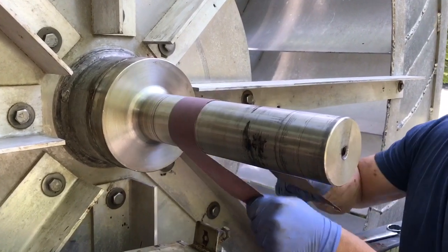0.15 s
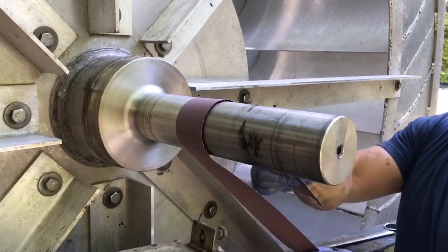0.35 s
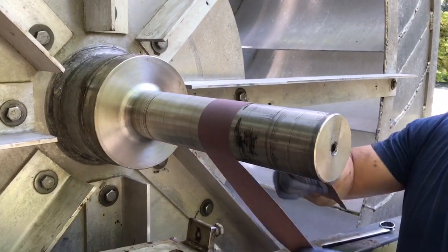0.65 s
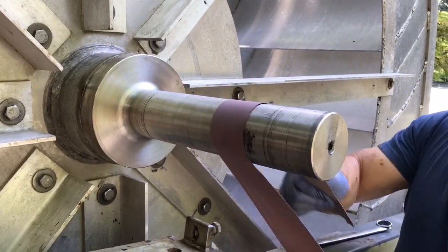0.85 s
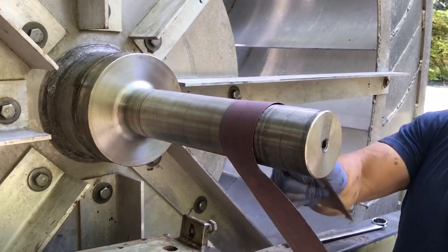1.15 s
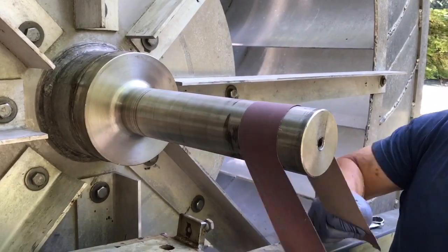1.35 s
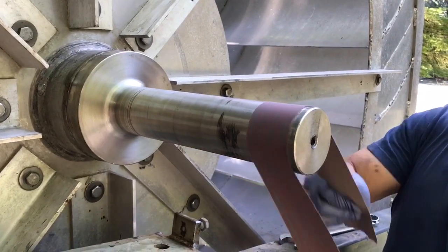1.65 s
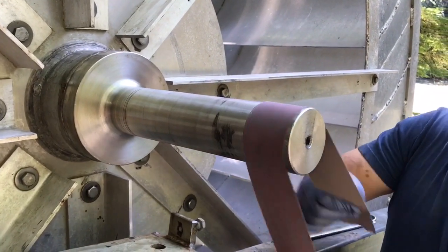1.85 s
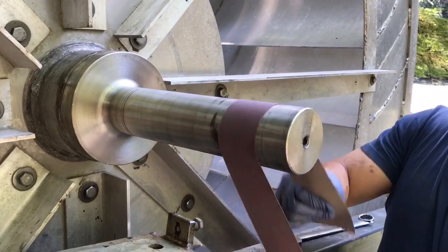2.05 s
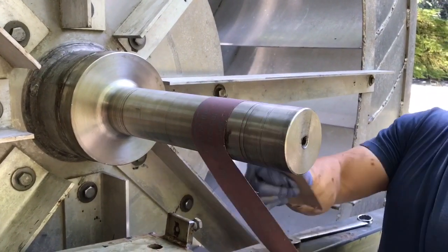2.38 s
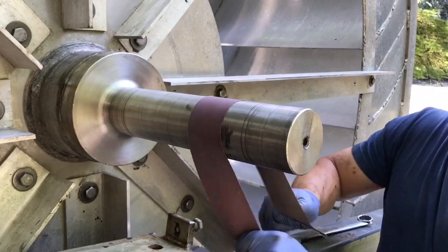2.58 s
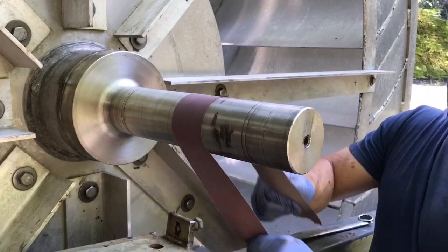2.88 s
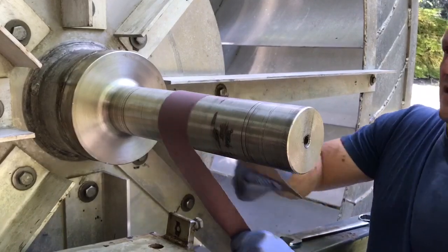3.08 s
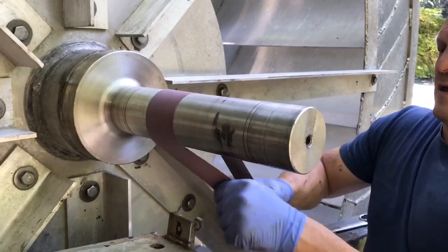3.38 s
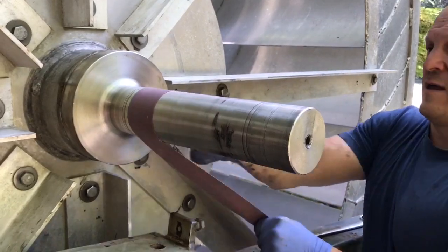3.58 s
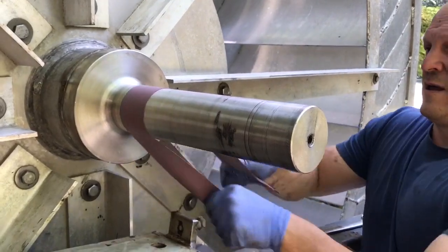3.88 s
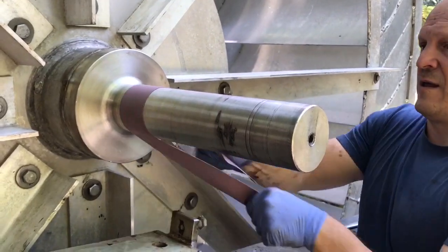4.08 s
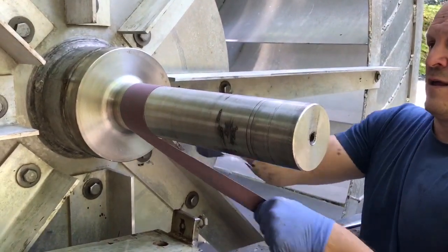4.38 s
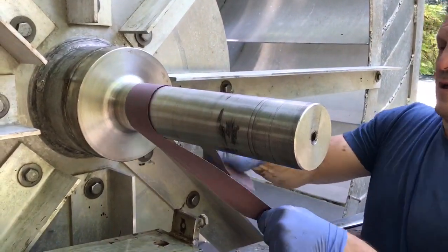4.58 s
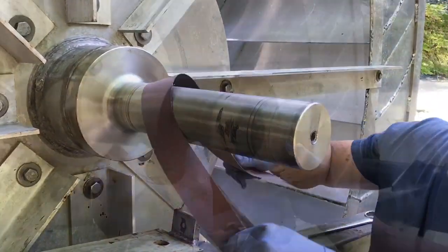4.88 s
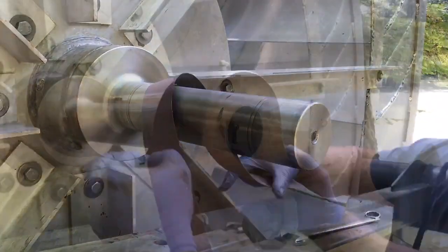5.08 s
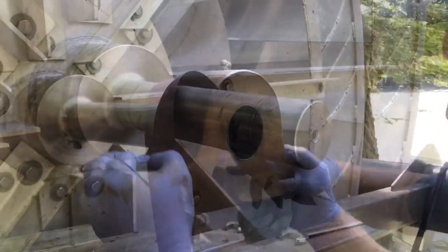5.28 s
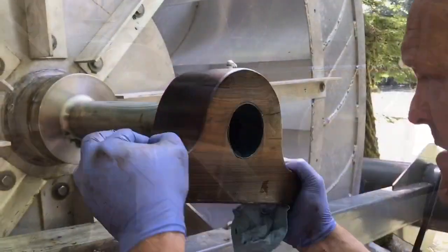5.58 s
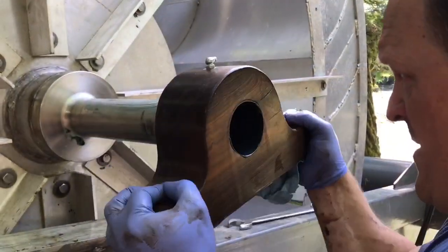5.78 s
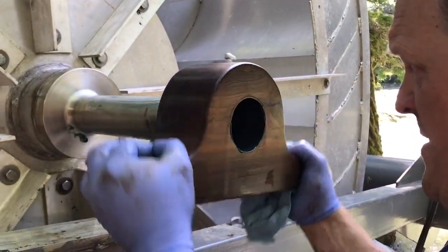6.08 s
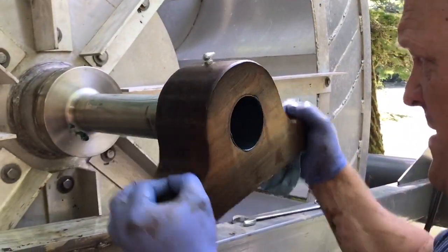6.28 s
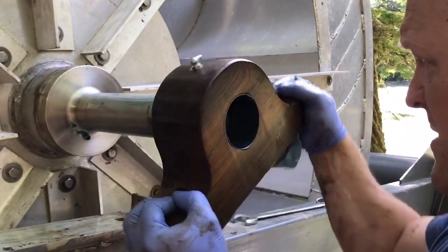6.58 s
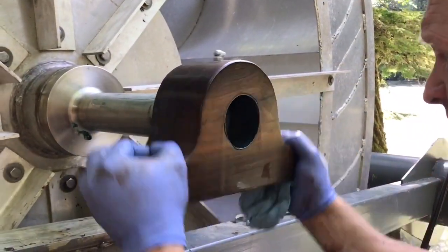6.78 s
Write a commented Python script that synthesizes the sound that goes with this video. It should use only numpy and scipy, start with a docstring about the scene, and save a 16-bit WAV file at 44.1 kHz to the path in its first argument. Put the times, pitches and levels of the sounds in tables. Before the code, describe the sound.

Emery cloth rasps quickly back and forth around a steel shaft, then a wooden block rubs softly as light wind touches the microphone.

```python
"""Emery cloth on a steel shaft

A strip of emery cloth is pulled to and fro round a steel shaft, in a workshop open to the outside.
Each pull is a dense rain of grit contacts: a bright fizz, a rasp, and a coarser chatter when the cloth
bites and the taut strip rings. Then a wooden lap is rocked softly on the shaft with a hollow rub,
and a draught buffets the microphone over the steady air noise."""
import sys
import numpy as np
from scipy import signal
from scipy.fft import rfft, irfft
from scipy.io import wavfile
from scipy.ndimage import uniform_filter1d

SR = 44100
rng = np.random.default_rng(int(sys.argv[2]) if len(sys.argv) > 2 else 0)


def unload_audio(sound):
    """Save the sound as a 16-bit wav file, at the path given as the first command line argument."""
    columns = np.transpose(np.atleast_2d(sound))
    # keep every value between -1 and 1, then stretch to whole-number steps
    steps = np.round(np.clip(columns, -1, 1) * 32767)
    wavfile.write(sys.argv[1], SR, steps.astype(np.int16))


N = 306046
TIME = np.arange(N) / SR


def gain_of(db):
    """Decibels to amplitude."""
    return 10 ** (np.asarray(db) / 20)


def unit_rms(x):
    """Scales x to rms 1."""
    return x / np.sqrt(np.mean(x ** 2) + 1e-20)


def coloured(x, curve):
    """Shapes x with an EQ curve of (Hz, dB) points, at rms 1."""
    hz, db = np.transpose(curve)
    bins = np.fft.rfftfreq(N, 1 / SR)
    eq_db = np.interp(np.log(bins + 1), np.log(hz), db, left=-90, right=-90)
    return unit_rms(irfft(rfft(x) * gain_of(eq_db), N))


def wander(rate):
    """A random drift of rms 1 that changes course about rate times a second."""
    knots = rng.standard_normal(4096)
    return unit_rms(np.interp(TIME * rate, np.arange(len(knots)), knots))


def patchy_noise(depth_db, patch_frames, frame_samples):
    """Noise whose spectrum has patches that come and go."""
    spectrum = signal.stft(rng.standard_normal(N), SR, nperseg=frame_samples)[2]
    patches = rng.standard_normal(spectrum.shape)
    for _ in range(2):
        patches = uniform_filter1d(patches, size=3, axis=0)
        patches = uniform_filter1d(patches, size=patch_frames, axis=1)
    return signal.istft(spectrum * gain_of(depth_db * unit_rms(patches)), SR)[1][:N]


def resonate(x, hz, width_hz):
    """A resonance that follows the curve hz, at rms 1; two poles give it steep skirts."""
    carrier = np.exp(2j * np.pi * np.cumsum(hz) / SR)
    pole = np.exp(-np.pi * width_hz / SR)
    baseband = signal.lfilter([1], [1, -2 * pole, pole * pole], x / carrier)
    return unit_rms((carrier * baseband).real)


def swells(rows):
    """An envelope with one bell-shaped rise and fall for each row."""
    return sum(gain_of(db) * np.exp(-2 * ((TIME - peak) / half_s) ** 2) for peak, db, half_s in rows)


def air(drift_db=0.26):
    """The steady, far bed of noise from yard and workshop."""
    # The dull tone of the air. Each row: frequency in Hz, relative level in dB.
    air_eq = [(25, -23), (45, -12), (75, -5), (150, -4.5), (210, -0.5), (340, -.5), (490, -5), (650, -3),
              (880, -2), (1400, -4.5), (2500, -10), (5000, -16.5), (8000, -25.5), (10400, -28.5),
              (12000, -29), (15800, -30)]
    # Its level ride. Each row: time in seconds, level in dB.
    ride = [(0, -42.5), (2.5, -42), (4.8, -42), (5.4, -44), (5.75, -42), (6.9, -42.5)]
    level_db = np.interp(TIME, *np.transpose(ride)) + drift_db * wander(7)
    bed = patchy_noise(depth_db=1.5, patch_frames=3, frame_samples=2048)
    return gain_of(level_db) * coloured(bed, air_eq)


def pull_envelopes(grip_s=0.014, release_s=0.012, drag_s=0.056, snap_db=10):
    """Gains of rasp, chatter and fizz: speed arches over each pull, pressure shifts as the hands turn."""
    # The pulls. Each row: start and end in seconds, level in dB, brightness in dB,
    # opening bite in dB, length of the bite in seconds, drag before the turn in dB.
    pulls = [(0.035, 0.223, -27, 2, 7.5, 0.041, -6), (0.249, 0.443, -33.5, 3.5, 5, 0.069, 12),
             (0.464, 0.64, -26, 2.2, 9.7, 0.045, -1.5), (0.664, 0.855, -34, 3, 7.5, 0.045, 7.5),
             (0.877, 1.051, -31, 3, 13.5, 0.053, 2), (1.068, 1.241, -31.0, 4, 3, 0.031, 1.5),
             (1.268, 1.457, -26.5, 2.4, 7, 0.034, -1), (1.471, 1.655, -35.5, 2.5, 6.5, 0.057, 5.5),
             (1.676, 1.861, -31, 3, 8, 0.044, 3.5), (1.88, 2.055, -33.7, 1, 5, 0.054, 13.7),
             (2.082, 2.275, -35.5, 0.2, 20.0, 0.058, 9.5), (2.295, 2.46, -27, -0.9, 7.5, 0.042, 3),
             (2.497, 2.692, -35.1, 1.2, 9, 0.036, 7.5), (2.707, 2.87, -30.5, -1.2, 7.5, 0.085, 1.2),
             (2.907, 3.087, -36.5, 0.8, 6.5, 0.021, 6.7), (3.103, 3.277, -28.5, -1.0, 6, 0.044, 5),
             (3.31, 3.506, -37.5, 1.5, 18, 0.046, 9.5), (3.523, 3.717, -30.5, 0.8, 11, 0.054, -4),
             (3.737, 3.929, -38, 2, 8.5, 0.026, 13.5), (3.949, 4.121, -36, 2, 14.5, 0.043, 3.5),
             (4.154, 4.337, -36, 0.5, 5, 0.053, 5), (4.366, 4.547, -36.5, -0.5, 6.5, 0.05, 4.5),
             (4.593, 4.877, -28.5, -1.8, -3, 0.071, -3.5), (4.863, 4.957, -50, -5, 6, 0.03, 0)]
    # How rasp, chatter and fizz answer the hands. Each row: level offset in dB, exponent of speed,
    # dB per dB of pressure, dB per dB of brightness.
    response = [(0, 0.66, 1, 0), (-5, 0.28, 1.0268, -0.76), (2.5, 0.88, 0.94, 1)]
    gains = np.zeros((3, N))
    for start, end, level_db, bright_db, bite_db, bite_s, drag_db in pulls:
        on = (TIME > start) & (TIME < end)
        since, until = TIME[on] - start, end - TIME[on]
        speed = np.sin(np.pi * since / (end - start))
        pressure_db = bite_db * np.exp(-(since / bite_s) ** 2)
        pressure_db += drag_db * np.exp(-(until / drag_s) ** 2)
        attack_s = grip_s * 0.5 ** (bite_db / snap_db)  # a hard bite takes hold faster
        sliding = np.clip(since / attack_s, 0, 1) * np.clip(until / release_s, 0, 1)
        for gain, (offset_db, by_speed, by_pressure, by_brightness) in zip(gains, response):
            force = gain_of(level_db + offset_db + by_pressure * pressure_db + by_brightness * bright_db)
            gain[on] += sliding * speed ** by_speed * force
    return gains


def grit(flutter_db=0.66):
    """Countless grains scratch the steel; the contact keeps shifting, so colour and level flutter."""
    scratch = patchy_noise(depth_db=1.88, patch_frames=5, frame_samples=512)
    return scratch * gain_of(flutter_db * wander(130))


def cloth(rasp_db=-0.2, chatter_db=-0.32, ring_db=-2, detune=0.027, ring_growth=0.49):
    """Grit noise in three bands; the harder the cloth bites, the more the strip rings."""
    # The three bands of the rubbing cloth. Each row: frequency in Hz, relative level in dB.
    rasp_eq = [(4400, -32), (4950, -4), (5300, -4), (6100, -1.5), (6450, -2.5), (7000, -1.5), (7650, -1.5),
               (8300, -1.5), (8900, 0.5), (9700, 0), (10400, -2.5), (11000, -21)]
    chatter_eq = [(500, -31), (1100, -10.5), (1600, -8), (1950, -3.5), (2200, -6.5), (2450, -3), (3300, 0),
                  (4000, -0.5), (4700, -3), (5300, -6.5)]
    fizz_eq = [(9900, -28), (10450, -1.5), (11000, -4), (11800, -1.5), (12800, -0.5), (13700, 0),
               (14800, -3.5), (15800, -1)]
    # Resonances of the taut strip. Each row: frequency in Hz, width in Hz, relative level in dB.
    modes = [(2460, 230, -13), (3320, 130, -5.5), (5290, 430, -3.5), (8600, 330, -3)]
    rasp, chatter, fizz = pull_envelopes()
    rub = gain_of(rasp_db) * rasp * coloured(grit(), rasp_eq)
    rub += gain_of(chatter_db) * chatter * coloured(grit(), chatter_eq)
    rub += fizz * coloured(grit(), fizz_eq)
    bend = 1 + detune * wander(8)  # the strip's pitch drifts with its tension
    ring = sum(gain_of(db) * resonate(rng.standard_normal(N), hz * bend, width)
               for hz, width, db in modes)
    ring_gain = gain_of(ring_db) * chatter * (chatter / chatter.max()) ** ring_growth
    return rub + ring_gain * ring


def catches(width_hz=360, detune=0.0099):
    """Where the cloth catches, one resonance of the strip stands out as a fuzzy whistle."""
    # The whistles. Each row: peak time in seconds, pitch in Hz, level in dB, half-length in seconds.
    whistles = [(0.11, 12140, -27, 0.039), (0.524, 2240, -39, 0.046), (0.92, 3260, -37, 0.035),
                (1.313, 3440, -33.5, 0.032), (1.318, 8930, -27.5, 0.027), (1.344, 12800, -35, 0.046),
                (2.03, 5350, -35, 0.02), (2.104, 3580, -32.5, 0.021), (2.12, 9500, -31, 0.03),
                (2.39, 8730, -30.5, 0.035), (3.2, 2480, -36, 0.057), (3.33, 2590, -35.5, 0.022),
                (3.58, 2650, -33, 0.033), (3.974, 11700, -25, 0.013), (4.786, 2400, -39, 0.073),
                (4.8, 4100, -38, 0.04)]
    bend = 1 + detune * wander(25)
    out = np.zeros(N)
    for peak, hz, db, half_s in whistles:
        near = abs(TIME - peak) < 2 * half_s
        swell = gain_of(db) * np.exp(-((TIME[near] - peak) / half_s) ** 2)
        out[near] += swell * resonate(rng.standard_normal(N)[near], hz * bend[near], width_hz)
    return out


def housing_echo(x, low_t60=0.15, treble_t60=0.2, wet_db=-18):
    """A weak, short echo from the steel housing; the treble hangs on slightly longer."""
    t = np.arange(SR // 2) / SR
    low, high = rng.standard_normal((2, len(t)))
    crossover = signal.butter(2, 5000, fs=SR)
    tail = signal.lfilter(*crossover, low) * gain_of(-60 * t / low_t60)
    tail += 0.5 * (high - signal.lfilter(*crossover, high)) * gain_of(-60 * t / treble_t60)
    tail *= t > 0.004  # pre-delay
    return gain_of(wet_db) * signal.fftconvolve(x, tail / np.linalg.norm(tail))[:N]


def draught(puff_db=-1, puff_hz=78, wobble=0.25, stir=0.66):
    """Eddies at the microphone: a low flutter that builds, and a few stronger puffs."""
    # The breeze as it sets in, then at full strength. Each row: time in seconds, level in dB.
    build = [(4.95, -68), (6.4, -53)]
    # Single puffs. Each row: peak time in seconds, relative level in dB, half-length in seconds.
    puffs = [(5.06, -49, 0.014), (5.24, -49, .034), (5.65, -49, .03), (6.105, -45, 0.016),
             (6.265, -41, .015), (6.326, -34, 0.028), (6.44, -42, 0.074), (6.641, -35.5, .013),
             (6.724, -30, .017), (6.76, -41, .035), (6.92, -48, 0.023)]
    eddy_eq = [(22, -30), (42, 2), (70, 1), (115, 2), (170, -9.5), (400, -35)]
    eddies = coloured(rng.standard_normal(N), eddy_eq)
    breeze = gain_of(np.interp(TIME, *np.transpose(build))) * (TIME > build[0][0])
    # a puff is one short roll of pressure that stirs up the eddies
    roll_hz = puff_hz * np.exp(wobble * wander(90))
    roll = np.sqrt(2) * np.sin(2 * np.pi * np.cumsum(roll_hz) / SR)
    return breeze * eddies + gain_of(puff_db) * swells(puffs) * (roll + stir * eddies)


def wooden_lap(seated_at_s=5.65, seated_db=-52.5, settle_s=0.05):
    """The wooden block rubs hollowly on the shaft: faint once seated, louder at each push."""
    # The hollow tone of the wood. Each row: frequency in Hz, relative level in dB.
    wood_eq = [(110, -25), (180, 4), (280, -2), (400, -5), (520, -12), (690, 0.5), (850, -29), (1500, -29)]
    # Pushes and light scuffs. Each row: peak time in seconds, level in dB, half-length in seconds.
    pushes = [(5.125, -45, .025), (5.73, -49, 0.065), (5.98, -55, .06), (6.15, -52, 0.05), (6.39, -49, .05),
              (6.75, -51, 0.054)]
    scuffs = [(5.785, -52, 0.034), (6.09, -53, 0.013)]
    seated = gain_of(seated_db) * np.clip((TIME - seated_at_s) / settle_s, 0, 1)
    hiss = coloured(rng.standard_normal(N), [(1500, -10), (4000, -2), (9000, 0), (15800, -5)])
    rub = coloured(rng.standard_normal(N), wood_eq)
    return (seated + swells(pushes)) * rub + swells(scuffs) * hiss


def scene():
    """All sources reach one microphone; only the cloth strokes feed the echo."""
    strokes = cloth() + catches()
    mono = strokes + housing_echo(strokes) + air() + draught() + wooden_lap()
    return np.array([mono, mono])


def record(dry, cutoff_hz=15830):
    """The microphone port notches the treble, then a steep low-pass trims the top."""
    # Narrow dips of the port. Each row: centre in Hz, width in Hz, gain in dB.
    dips = [(4980, 174, -4), (7580, 320, -2), (10440, 250, -6)]
    bins = np.fft.rfftfreq(N, 1 / SR)
    port_db = sum(db * np.exp(-((bins - hz) / width) ** 2) for hz, width, db in dips)
    notched = irfft(rfft(dry) * gain_of(port_db), N)
    low_pass = signal.firwin(511, cutoff_hz, window=("kaiser", 9), fs=SR)
    return signal.oaconvolve(notched, low_pass[None], "same")


dry = scene()
out = record(dry)
unload_audio(out)
```